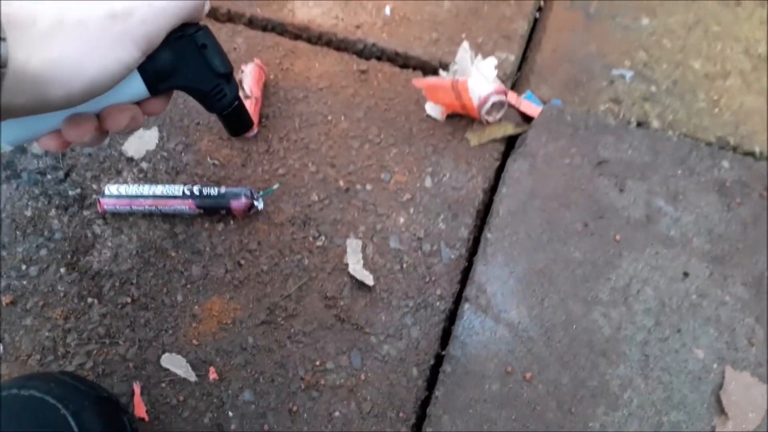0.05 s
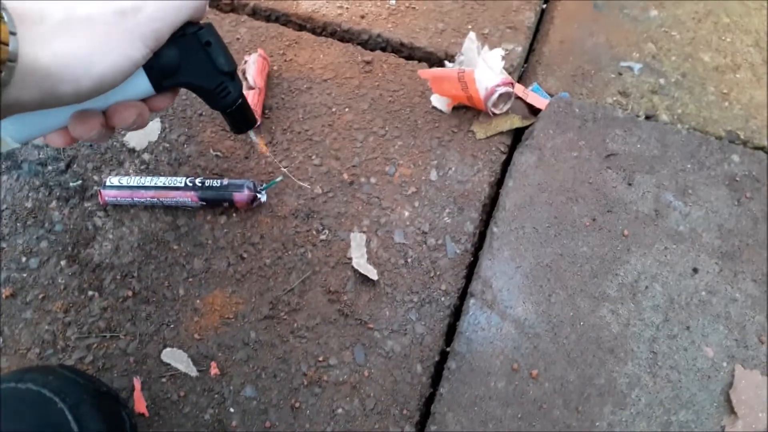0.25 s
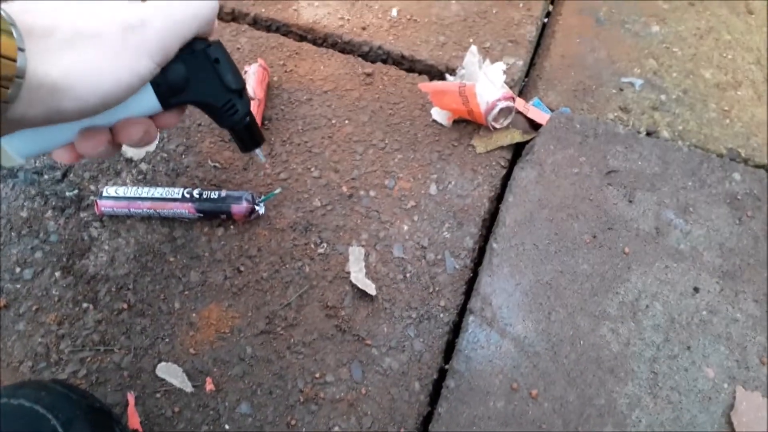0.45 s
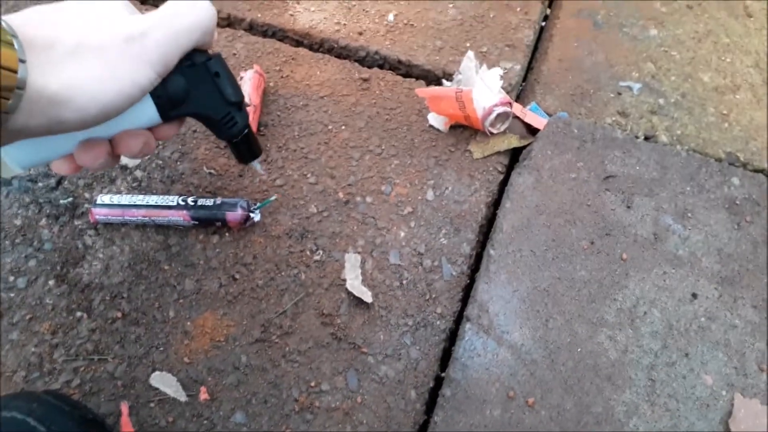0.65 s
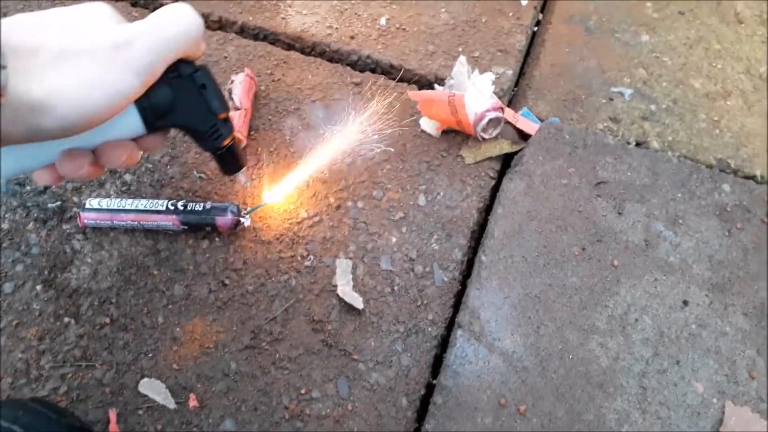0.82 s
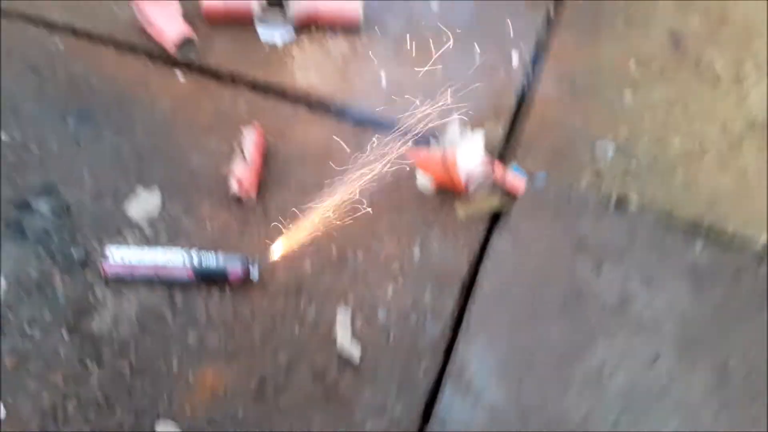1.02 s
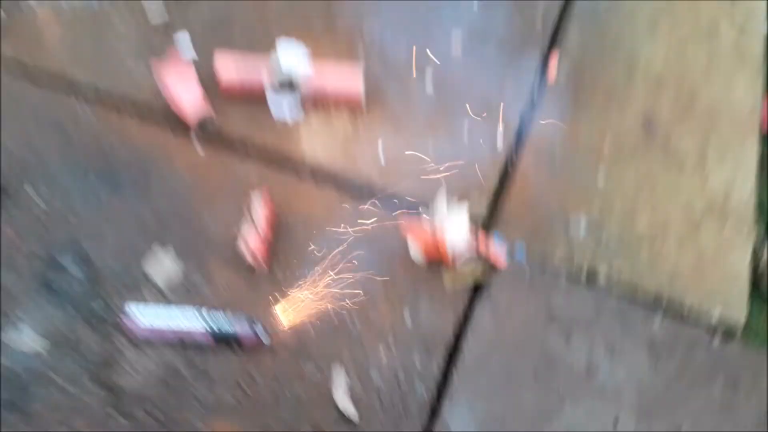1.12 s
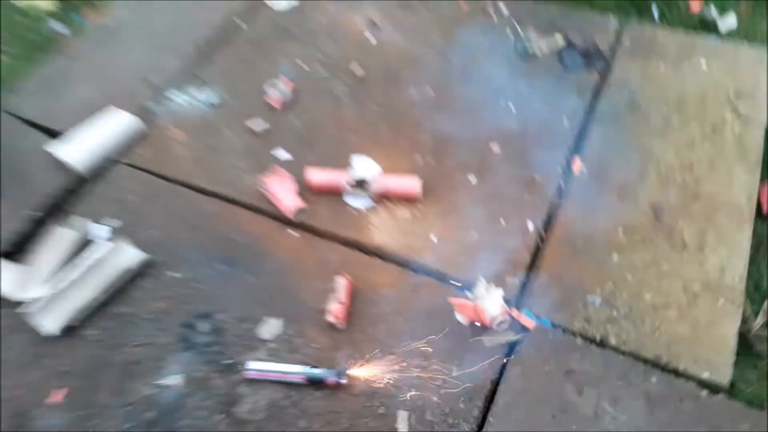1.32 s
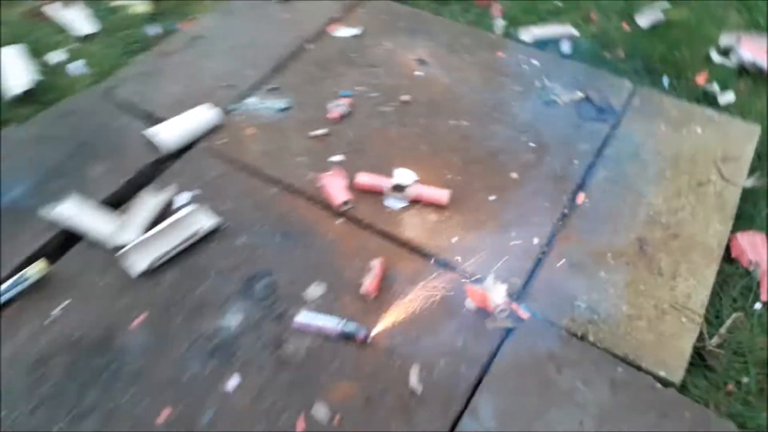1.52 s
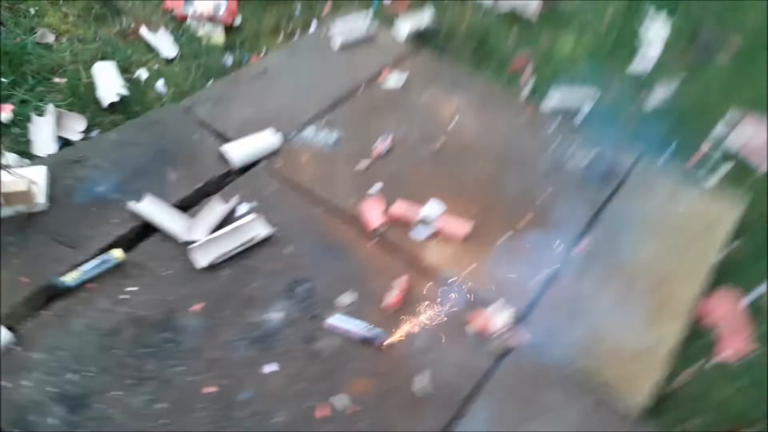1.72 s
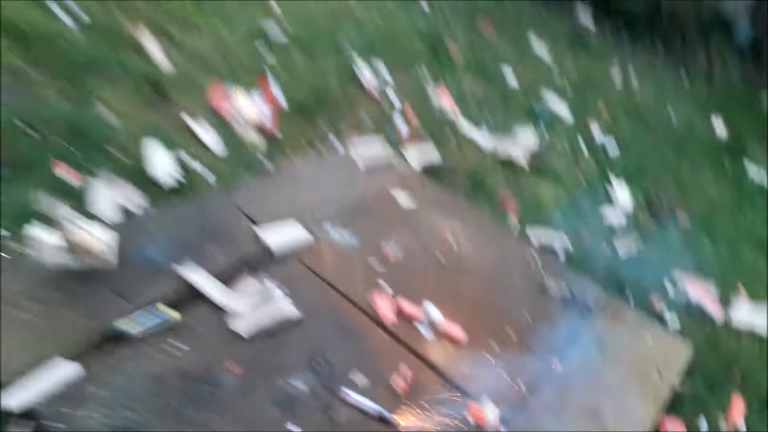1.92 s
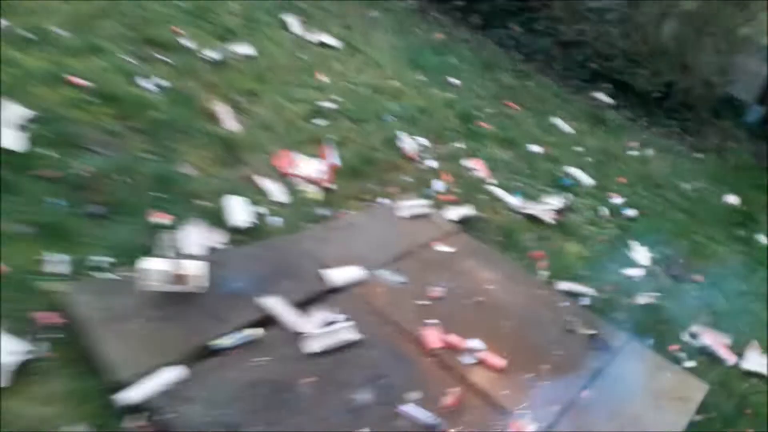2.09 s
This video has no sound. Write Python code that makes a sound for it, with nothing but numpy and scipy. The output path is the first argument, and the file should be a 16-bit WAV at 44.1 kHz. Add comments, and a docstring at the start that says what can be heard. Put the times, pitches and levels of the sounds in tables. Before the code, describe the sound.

A firecracker fuse hisses and spits sparks on garden paving after a single sharp lighter click and faint gas flame; close phone microphone outdoors, the hiss fading as it backs away, with no bang.

```python
"""Faint outdoor air, coloured noise, lies underneath throughout.
A gas lighter snaps once over garden paving: spring blows ring its body and the garden returns a tail.
Its small flame then hisses softly: a ragged spurt of gas noise, then a steadier, easing one.
Half a second after the snap a firecracker's fuse catches: a sputtering jet of gas noise and spark
pops with a few larger cracks, fading as the phone backs away."""
import sys
import numpy as np
from scipy import signal
from scipy.fft import rfft, irfft
from scipy.io import wavfile
from scipy.ndimage import map_coordinates

SR = 44100
rng = np.random.default_rng(int(sys.argv[2]) if len(sys.argv) > 2 else 0)


def generate_wav(signal):
    """Clip the signal to [-1, 1] and save it as 16-bit WAV at the path in sys.argv[1]."""
    frames = np.transpose(np.atleast_2d(signal))
    scaled = np.clip(frames, -1, 1) * 32767
    pcm = np.round(scaled).astype(np.int16)
    wavfile.write(sys.argv[1], SR, pcm)


N = 94815


def undb(db):
    """Decibels to gain."""
    return 10 ** (np.asarray(db) / 20)


def unit(x):
    """Scale to rms 1."""
    return x / np.sqrt(np.mean(x ** 2))


def colour(x, points):
    """Filter by a curve of (f/Hz, level/dB) points, straight over log frequency; rms 1."""
    hz, db = np.array(points, float).T
    f = np.maximum(np.arange(N // 2 + 1) * SR / N, 1)
    gain = undb(np.interp(np.log(f), np.log(hz), db))
    return unit(irfft(rfft(x) * gain, N))


def noise():
    """White noise."""
    return rng.standard_normal(N)


def walk(rate):
    """Random wander of rms 1, joining `rate` random points per second by straight lines."""
    return unit(map_coordinates(noise(), [np.arange(N) * rate / SR], order=1))


# spectrum of the outdoor air [f/Hz, level/dB]
AIR_COLOUR = [(20, -33.5), (35, -14), (65, -1), (110, 0), (170, 1), (280, -6), (420, -9), (700, -12),
              (900, -6.5), (1300, -6.5), (2000, -6.5), (3000, -11.5), (3400, -21), (3900, -32),
              (6500, -30.5), (8200, -28.5), (11000, -30), (15500, -35.5)]
AIR_DB = -56


def air():
    """Quiet outdoor background: coloured noise, wavering slightly in level."""
    return colour(noise(), AIR_COLOUR) * undb(AIR_DB + 0.78 * walk(10))


# spectrum of the burning flame [f/Hz, level/dB]
FLAME_COLOUR = [(100, -23.5), (250, -8.5), (480, -1), (850, -1.5), (1300, 3.5), (1650, -3), (2000, 2.5),
                (2500, -3), (3100, -7), (3450, -20), (3900, -44.5), (6500, -45), (8000, -34),
                (11000, -35.5), (13000, -23.5), (15500, -49)]
FLAME_ON_S, FLAME_ATTACK_S, FLAME_OFF_S, FLAME_RELEASE_S = 0.25, 0.02, 0.9, 0.086
FLAME_DB, FLAME_SAG_DB_PER_S = -51.5, -12.5
# spectrum of the first spurt of gas as the valve opens [f/Hz, level/dB]
SPURT_COLOUR = [(2000, -14), (3600, 0.5), (4600, -5), (6500, -6.5), (7500, 0.5), (8600, -8.5), (11000, -13),
                (15500, -16)]
SPURT_AT_S, SPURT_DB, SPURT_DECAY_S, SPURT_GRAIN_DB = 0.261, -57.5, 0.05, 2.5


def lighter_flame(t):
    """Gas spurts raggedly from the nozzle, then burns steadily, easing off until the trigger is let go."""
    opening = np.clip((t - FLAME_ON_S) / FLAME_ATTACK_S, 0, 1)
    closing = np.clip(1 - (t - FLAME_OFF_S) / FLAME_RELEASE_S, 0, 1)
    flame_db = FLAME_DB + FLAME_SAG_DB_PER_S * (t - FLAME_ON_S) + 0.5 * walk(30)
    flame = colour(noise(), FLAME_COLOUR) * opening * closing * undb(flame_db)
    spurt_decay = (t > SPURT_AT_S) * np.exp(-np.abs(t - SPURT_AT_S) / SPURT_DECAY_S)
    spurt = colour(noise(), SPURT_COLOUR) * spurt_decay
    return flame + undb(SPURT_DB + SPURT_GRAIN_DB * walk(300)) * spurt


# blows of the lighter's spring striker [t/s, level/dB, treble tilt/dB per octave]
STRIKER_BLOWS = [(0.24536, -8, 7), (0.24598, 0.2, -5.5), (0.24824, -8.5, -10.5), (0.266, -31.5, 3.5),
                 (0.292, -48, 5), (0.305, -53, 7)]
# ringing modes of the lighter's body [f/Hz, level/dB, t60/s]
BODY_MODES = [(1992, -21.5, 0.048), (2860, -13.5, 0.011), (2986, -2.5, 0.0094), (3353, -8, 0.015),
              (3686, -17.5, 0.0205), (4540, -20, 0.0075), (5400, -12.5, 0.00857), (7086, -25, 0.013),
              (7483, -10, 0.0095), (7640, -14.8, 0.0082), (8640, -19.5, 0.011), (9840, -30.5, 0.016),
              (11000, -23, 0.0059), (13256, -34.5, 0.0069)]
BODY_LOW_HZ, CONTACT_S = 1700, 0.00049  # low cut of the click; fade-in of each blow
CRACK_DB, CRACK_S = -28, 0.0016
THUMP_HZ, THUMP_DB, THUMP_S = 100.6, -44.5, 0.016
KNOCK_DB, KNOCK_S = -37.5, 0.0055
GARDEN_DB, GARDEN_T60_S, GARDEN_DELAY_S = -34, 0.2, 0.012  # the tail swells in over the delay


def lighter_click(t):
    """The striker hits and rebounds, ringing the small plastic body; the garden returns a faint tail."""
    click = np.zeros(N)
    hz, db, t60 = np.array(BODY_MODES).T[:, :, None]
    size = SR // 20
    for start, blow_db, tilt_db in STRIKER_BLOWS:
        i = int(start * SR)
        age = np.maximum(t[i:i + size] - start, 0)
        mode_db = db + tilt_db * np.log2(hz / hz[2]) - 60 * age / t60  # tilt pivots on the third mode
        ring = undb(mode_db) * np.sin(2 * np.pi * hz * age)
        crack = undb(CRACK_DB) * rng.standard_normal(size) * np.exp(-age / CRACK_S)
        contact = np.minimum(age / CONTACT_S, 1)
        click[i:i + size] += undb(blow_db) * (ring.sum(0) + crack) * contact
    click = signal.sosfilt(signal.butter(2, BODY_LOW_HZ, "high", fs=SR, output="sos"), click)

    tail = noise() * undb(-60 * t / GARDEN_T60_S) * np.minimum(t / GARDEN_DELAY_S, 1)
    echo = signal.fftconvolve(click, tail / np.linalg.norm(tail))[:N]

    since = np.maximum(t - STRIKER_BLOWS[0][0], 0)
    thump = np.sin(2 * np.pi * THUMP_HZ * since) * np.exp(-since / THUMP_S)
    knock = colour(noise(), [(60, -10.0), (200, 0.5), (560, 0), (800, -12), (3000, -28)])
    knock = knock * (since > 0) * np.exp(-since / KNOCK_S)
    return click + undb(GARDEN_DB) * echo + undb(THUMP_DB) * thump + undb(KNOCK_DB) * knock


# larger grains that pop in the jet [t/s, rms level at the start/dB]
GRAIN_POPS = [(1.398, -30), (1.527, -27), (1.553, -28)]
# spectrum of those pops [f/Hz, level/dB]
GRAIN_POP_COLOUR = [(300, -22), (1300, 0), (2600, 2), (3300, -4), (4000, -17), (8000, -25), (15000, -42)]
POP_DECAY_S = 0.0018


def pops(t):
    """A few larger grains of powder burst with a short crack of decaying noise."""
    envelope = sum(undb(db) * (t > at) * np.exp(-np.abs(t - at) / POP_DECAY_S) for at, db in GRAIN_POPS)
    bursts = noise() * envelope
    return colour(bursts, GRAIN_POP_COLOUR) * bursts.std()  # colouring keeps the level


SPARKS_PER_S, SPARK_SPREAD_DB = 2500, 3.5


def sparks(share):
    """Tiny pops of powder grains of very unequal size, mixed by power share with gas noise."""
    fires = rng.random(N) < SPARKS_PER_S / SR
    size_db = SPARK_SPREAD_DB * np.minimum(rng.exponential(size=N), 5)
    grains = fires * np.sign(noise()) * undb(size_db)
    share = np.clip(share, 0, 1)
    return np.sqrt(share) * unit(grains) + np.sqrt(1 - share) * noise()


DRIFT_DB, DRIFT_PER_S = 2, 12.07


def drifting(x, size=256):
    """Narrow bands of the treble spray drift smoothly in level, neighbours partly together."""
    _, when, bands = signal.stft(x, fs=SR, nperseg=size)
    band, moment = np.meshgrid(np.arange(len(bands)) / 2, when * DRIFT_PER_S, indexing="ij")
    grid = rng.standard_normal((size, size))
    drift = unit(map_coordinates(grid, [band, moment], order=1, mode="mirror"))
    return unit(signal.istft(bands * undb(DRIFT_DB * drift), fs=SR, nperseg=size)[1][:N])


# the fuse as it burns
# [t/s, hiss level/dB, low rush level/dB, low treble level/dB, middle treble level/dB, high treble level/dB]
FUSE_BURN = [(0.79, -58, -57, -88, -94, -92), (0.8, -54, -59, -70, -65, -72),
             (0.826, -35.5, -39, -55.5, -57, -63), (0.858, -30.5, -39, -44.5, -52.5, -62),
             (0.876, -32.5, -38.5, -52.5, -55, -62), (0.948, -27.5, -38, -42, -46.5, -53),
             (1.002, -28, -40, -44, -50.5, -59), (1.012, -30.5, -42, -46, -51, -63),
             (1.07, -32.5, -39.5, -48, -54.5, -61), (1.104, -30, -42, -44.5, -48, -56.5),
             (1.168, -35, -43.5, -48, -50, -59), (1.21, -34, -42.5, -47, -50.5, -55.5),
             (1.296, -38.5, -44.5, -47.5, -54, -56), (1.312, -38, -46, -50, -56.5, -63),
             (1.354, -37.5, -45.5, -45, -47.5, -53), (1.406, -37.5, -46.5, -49, -55, -55.5),
             (1.464, -37.5, -42, -47, -54.5, -49), (1.508, -36, -43, -48.5, -55, -60),
             (1.546, -34.5, -41.5, -45.5, -52, -57), (1.638, -33.5, -43.5, -46, -52.5, -52),
             (1.686, -40.5, -48, -50, -60, -62), (1.728, -38.5, -42.5, -51, -57, -58),
             (1.758, -38, -48, -50, -60, -54), (1.812, -42.5, -45, -55.5, -63, -62),
             (1.85, -39.5, -43.5, -48.5, -52, -55), (1.864, -43.5, -48, -55, -60, -62),
             (1.888, -38.5, -46, -49, -55.5, -56), (1.926, -45, -52, -57, -65, -66),
             (1.948, -40.5, -45.5, -51, -57, -60), (1.998, -44, -47, -51, -64, -63),
             (2.138, -38, -45, -47.5, -56.5, -60), (2.15, -39, -48, -48, -56, -57)]
# spectrum of the jet's hiss [f/Hz, level/dB]
HISS_COLOUR = [(900, -41), (1400, -12), (1800, -5.5), (2250, -1.5), (2600, -0.5), (3150, -2.5), (3500, -10),
               (3900, -21.5), (6000, -57)]
# spectrum of the jet's low rush [f/Hz, level/dB]
RUSH_COLOUR = [(50, -42), (110, -19), (200, -7.5), (330, -4.5), (470, -2.5), (750, -.5), (930, -2),
               (1300, 3.5), (1600, 0.5), (2200, -15), (4000, -52)]
# spectrum of the sparks' fizz, the low treble [f/Hz, level/dB]
FIZZ_COLOUR = [(2500, -24), (3700, 0), (4500, -0.5), (5600, -0.5), (6700, -4.5), (7130, -15), (8000, -42)]
# spectrum of the sparks' spit, the middle treble [f/Hz, level/dB]
SPIT_COLOUR = [(6900, -30), (7200, -6.5), (7550, 0), (8050, 0), (8900, -4.5), (9700, -5), (10200, -12),
               (11500, -38)]
# spectrum of the sparks' sizzle, the high treble [f/Hz, level/dB]
SIZZLE_COLOUR = [(9000, -34), (10200, -2), (11200, 0.5), (13000, -5), (14000, -8), (15700, -13)]
# spectrum of the sizzle's crisp top, lost as the phone backs away [f/Hz, level/dB]
CRISP_COLOUR = [(12800, -30), (14400, 1), (15700, -1)]
# trims added to the burn levels; the crisp top follows the sizzle
HISS_DB, RUSH_DB, FIZZ_DB, SPIT_DB, SIZZLE_DB = 0.02, 0.53, 0.4, -0.5, -0.6
CRISP_DB, CRISP_FADE_DB_PER_S = -1.5, -15
SPUTTER_DB, SPUTTER_PER_S = 0.8, 260
SPARK_SHARE, HISS_SPARK_SHARE = 0.24, 0.28
# the slab mirrors the upper treble; the extra path wavers (as a fraction) as the phone moves
SLAB_LAG_S, SLAB_WAVER, SLAB_GAIN = 0.00062, 0.025, 0.15


def fuse(t):
    """Burning powder drives an uneven jet full of sparks; their upper treble is also mirrored by the slab."""
    when, *levels = np.array(FUSE_BURN).T
    hiss_db, rush_db, fizz_db, spit_db, sizzle_db = (np.interp(t, when, db, left=-120) for db in levels)
    sputter_db = SPUTTER_DB * walk(SPUTTER_PER_S)
    spray = drifting(sparks(SPARK_SHARE))

    hiss = colour(sparks(HISS_SPARK_SHARE), HISS_COLOUR) * undb(hiss_db + HISS_DB)
    fizz = colour(spray, FIZZ_COLOUR) * undb(fizz_db + FIZZ_DB)
    spit = colour(spray, SPIT_COLOUR) * undb(spit_db + SPIT_DB)
    sizzle = colour(spray, SIZZLE_COLOUR) * undb(sizzle_db + SIZZLE_DB)
    crisp_db = sizzle_db + CRISP_DB + CRISP_FADE_DB_PER_S * (t - when[0])
    crisp = colour(sparks(SPARK_SHARE), CRISP_COLOUR) * undb(crisp_db)

    treble = spit + sizzle + crisp
    lag = SLAB_LAG_S * (1 + SLAB_WAVER * walk(6))
    mirrored = map_coordinates(treble, [(t - lag) * SR], order=3)
    jet = hiss + fizz + treble + SLAB_GAIN * mirrored
    rush = colour(noise(), RUSH_COLOUR) * undb(rush_db + RUSH_DB + 0.5 * sputter_db)  # sputters half as deep
    return undb(sputter_db) * jet + rush


def scene():
    """Garden air under the lighter's flame and click, then the fuse and its pops."""
    t = np.arange(N) / SR
    return (air() + lighter_flame(t) + lighter_click(t) + pops(t) + fuse(t))[None]


TOP_HZ = 15800


def record(dry):
    """The phone clips at full scale and cuts the top with a steep low-pass."""
    low_pass = signal.ellip(10, 0.1, 80, TOP_HZ, fs=SR, output="sos")
    return signal.sosfilt(low_pass, np.clip(dry, -1, 1))


dry = scene()
out = record(dry)
generate_wav(out)
```